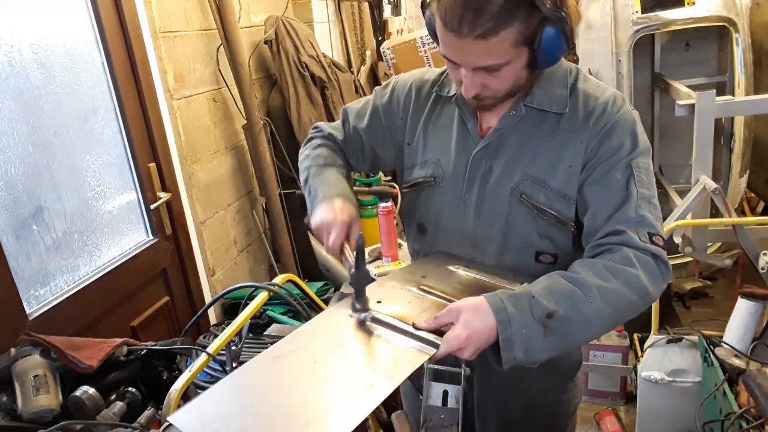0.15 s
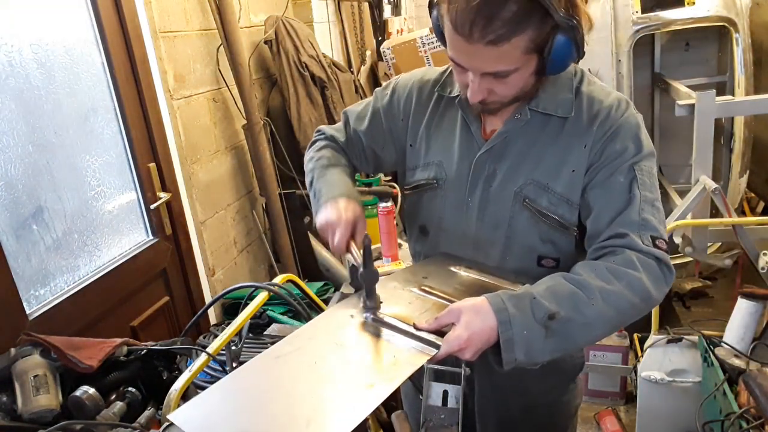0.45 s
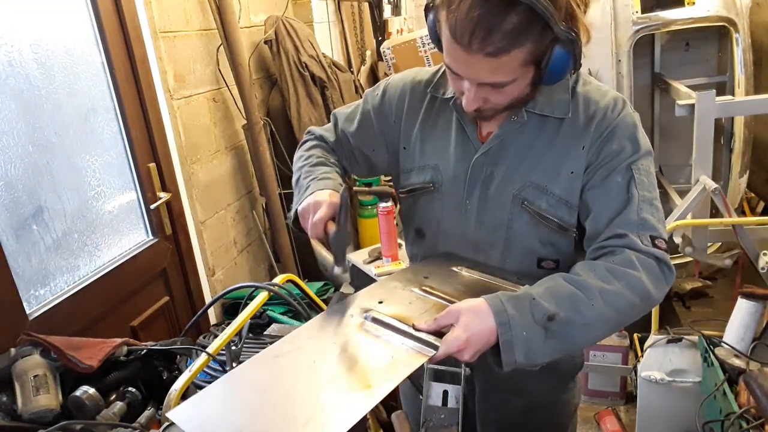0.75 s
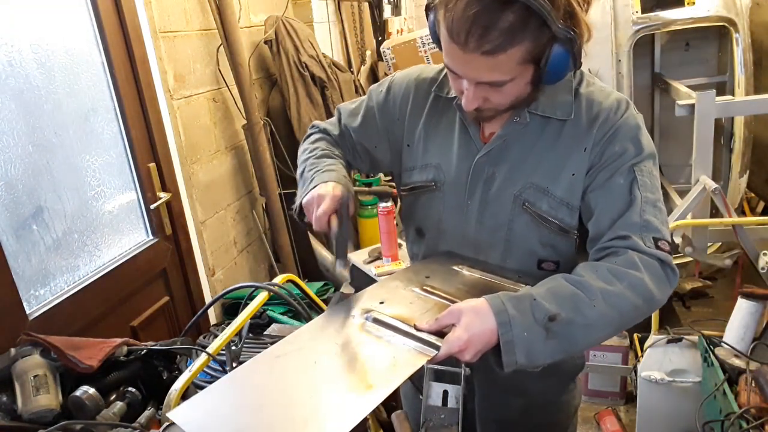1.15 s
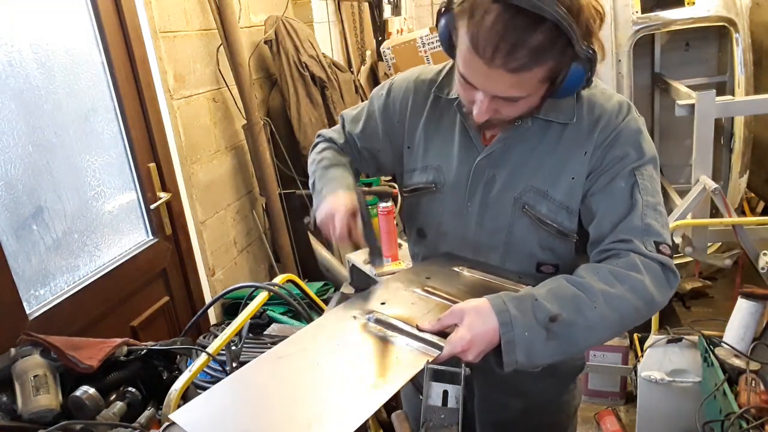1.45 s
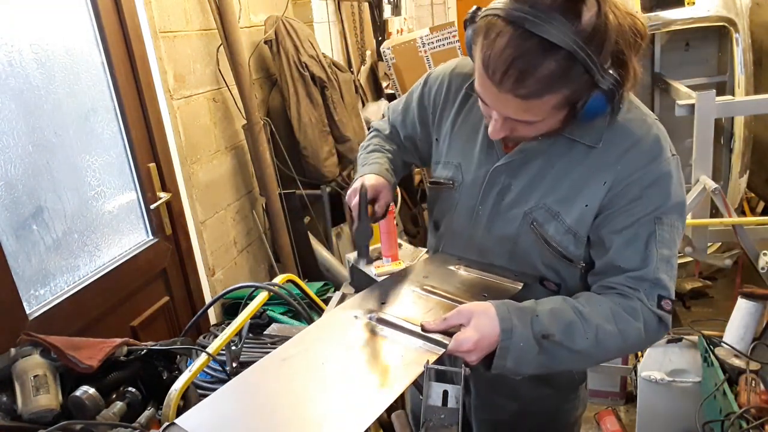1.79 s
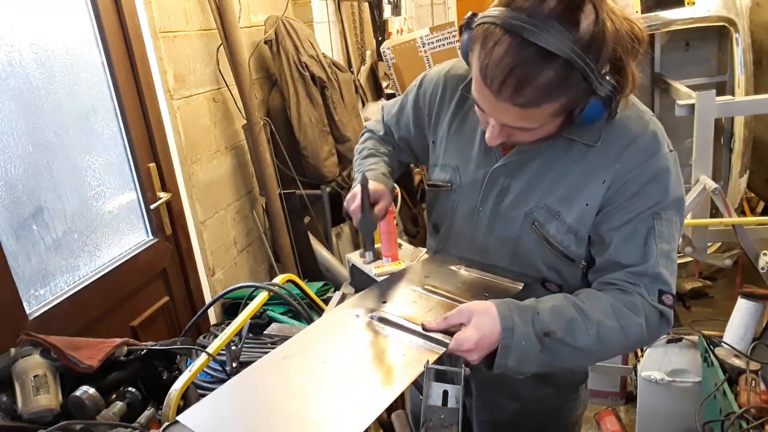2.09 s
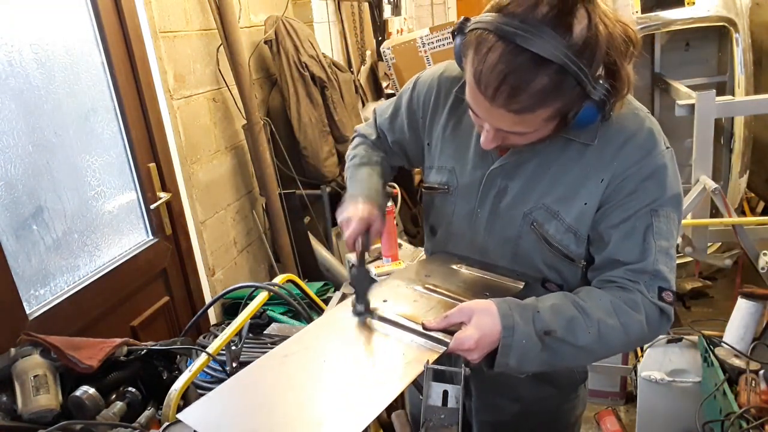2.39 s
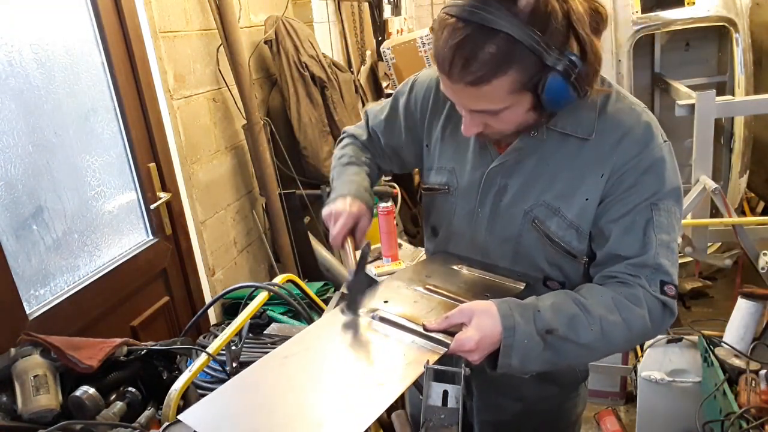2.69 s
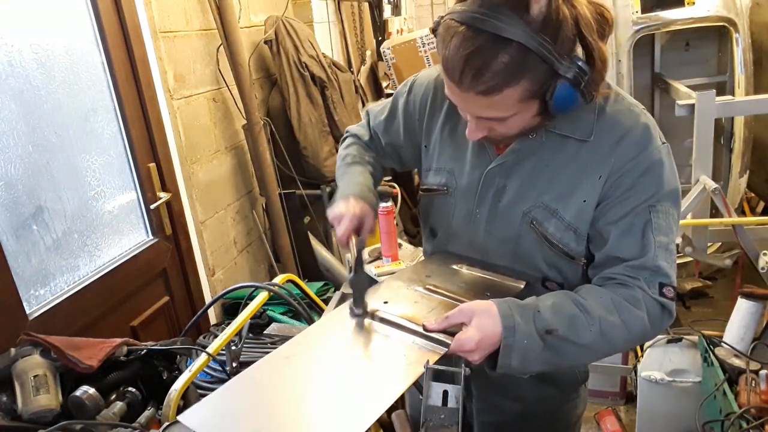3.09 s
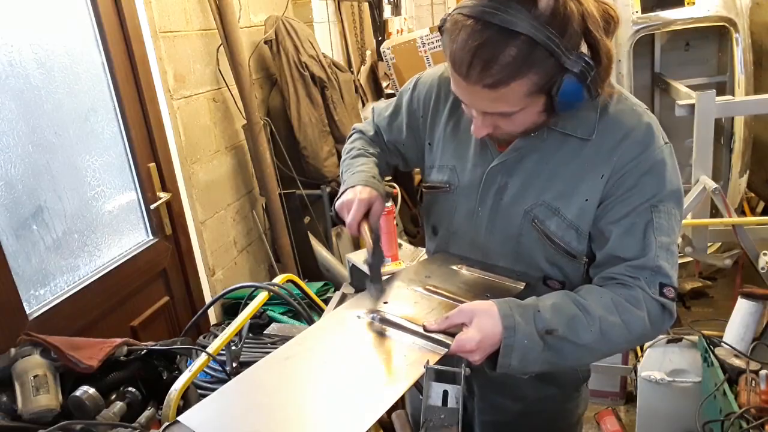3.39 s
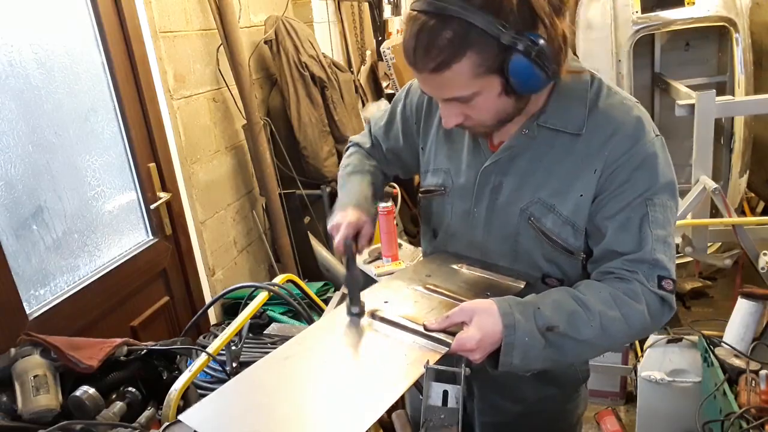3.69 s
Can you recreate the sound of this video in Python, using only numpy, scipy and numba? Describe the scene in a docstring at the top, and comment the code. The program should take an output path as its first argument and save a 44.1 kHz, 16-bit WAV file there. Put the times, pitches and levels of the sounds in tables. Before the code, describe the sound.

A hammer taps very rapidly on sheet steel, bright and ringing, with one brief pause.

```python
"""Hand hammer planishing a steel panel over a form tool: about 14 blows/s, in runs with short pauses.
Per blow: contact crack, dull knock of the dented patch, bright clash of the sheet's dense modes,
and a ring of longer modes whose balance depends on how the sheet lies on the tool.
The loose sheet also chatters lightly on the tool.
A small cluttered workshop adds a short tail and faint room noise."""
import sys
import numpy as np
from scipy import signal
from scipy.fft import rfft, irfft
from scipy.io import wavfile
from numba import njit

SR = 44100
rng = np.random.default_rng(int(sys.argv[2]) if len(sys.argv) > 2 else 0)


def store_pcm(level_fs):
    """Save levels as 16-bit WAV."""
    pcm = np.round(np.clip(level_fs, -1, 1) * 32767).astype(np.int16)
    wavfile.write(sys.argv[1], SR, np.atleast_2d(pcm).T)


N = 169785

# workshop reverberation: f/Hz, level/dB, t60/s
ROOM = [(396, -27, 0.2), (1040, -18.5, 0.36), (3000, -20, 0.043), (8000, -41.5, 0.086), (16000, -31.5, .21)]
# light touches of sheet on tool: t/s, level/dB, centre f/Hz, width/octaves, t60/s
TOUCHES = [(1.573, -34.5, 11700, 0.0064, 0.23), (1.574, -45.5, 8870, 0.006, 0.23),
           (1.634, -60, 1900, 1.4, 0.2), (1.81, -68.5, 1570, 2.3, 0.096), (3.185, -19, 3000, 0.99, 0.032)]
# hammer blows: t/s, relative level/dB, bass/dB, mid/dB, upper mid/dB, knock f/Hz
BLOWS = [(-0.064, 6, 27, 11, 5.5, 500), (0.1185, 1, 3.5, 0, -2, 470), (0.2002, -1, 3.5, 4, 3, 543),
         (0.2796, -2.5, 2, 3, 3, 590), (0.351, -2, -2, 2.5, 0.5, 814), (0.4244, -2, 1.5, 4, 2, 705.0),
         (0.495, -0.5, 1, 0.5, -0.5, 546), (0.5654, 0.5, 5.5, 1.5, -0.5, 685),
         (0.633, -1, 3.5, -0.5, 1.5, 630), (0.699, 0, 4, 0.5, -1, 570), (0.7676, -2, 5, 3.5, 1.5, 564),
         (0.8362, -2, 5, 5.5, 3, 410), (0.903, 0, -3.5, -2, -1.5, 343), (0.9683, -1.5, -1.5, 5, 1.0, 590),
         (1.0358, 1, 2, 2.5, 0.5, 390), (1.1038, -1, 3.5, 3.5, 1.5, 600), (1.1704, -2, 6, 3.5, 2.5, 610),
         (1.2396, -2.5, 4.5, 6, 4, 357), (1.3099, -2, 0.5, 5, 2.5, 553), (1.38, -1.5, 3, 4.5, 2, 580),
         (1.4501, -1.5, 2.5, 2.5, 3, 705), (1.5215, -2.5, 8.5, 3, 4, 487), (1.8773, 1, -1.5, 0, -1, 610),
         (1.9511, -1, 7, 1, 4, 760), (2.024, -0.5, 1, 4, 2.5, 765), (2.096, 0, 1, 3, 2, 342),
         (2.1672, -1, 5, 2.5, 2, 543), (2.237, -1.5, -0.5, 1.5, 3.5, 440), (2.3061, -0.5, 0, 1, 1.5, 670),
         (2.3753, -1, 0, 1, 0.5, 500), (2.4444, -1.5, 3, 4, 1, 770), (2.5143, -2, -0.5, 5, 1.5, 696),
         (2.5836, -2.5, 3, 5, 4, 543), (2.6535, -1.5, 3, 4, 2.5, 730), (2.7234, -1, 0.5, 5, 1, 700),
         (2.794, 0, -1, 2, -1.5, 520), (2.8631, 0, -2.5, 1, 0.5, 690), (2.931, 0, -3, 3.5, -1, 804),
         (2.999, -1, -2.5, 4.5, 1, 400), (3.0665, -1.5, 1, 5, 1, 590), (3.1359, -1, 2, 1, 3, 600),
         (3.2034, -1, 2, 2.5, 0, 670), (3.2723, -2.5, 7, 5.5, 3, 573), (3.341, -0.5, 4.5, 1.5, 2, 660),
         (3.4091, -0.0, -5.5, 2.5, -3, 725), (3.4779, -2.5, 5, 5.5, 2.5, 467),
         (3.5979, 0.5, 0.5, 2, 0, 437), (3.6765, -1, 2, 1.5, 1.5, 340.7), (3.7473, -1, 2, 0.5, 0, 494)]
# anchors of a blow's colour (bass, mid, upper mid, 0 dB top): f/Hz
COLOUR_HZ = [400, 1500, 5000, 12500]
# contact crack: f/Hz, relative density/dB
CRACK = [(60, -39.5), (300, -15), (1000, 6), (3500, 0), (8000, 7), (11000, 3), (16000, 9)]
# clash of dense modes: f/Hz, relative density/dB, hold/s, t60/s
CLASH = [(99, -39, 0.01, .08), (202, -7, 0.0038, 0.079), (343, 4.5, 0.0018, 0.06), (700, 2.5, 0.0047, 0.06),
         (1130, 0.5, 0.006, 0.12), (1610, 3, 0.012, 0.1), (2920, 0.5, 0.011, 0.12),
         (3840, 3.5, 0.0052, 0.11), (5670, 2, 0.011, 0.11), (8700, 4, 0.019, 0.095),
         (10400, 3.5, 0.018, 0.11), (12100, 6.5, 0.026, 0.072), (16100, 6.5, 0.0085, 0.12)]
# sheet moves to its next lie on the tool: t/s
LIE_SHIFTS_S = [0, 1.7, 2.83, 3.7]
# strong steel modes: f/Hz
STRONG_HZ = [1692, 1766, 1822, 1992, 2612, 5065, 5892, 6304, 8786, 10390, 11665, 13060]
# one row per strong mode: relative level/dB in each of five lies, t60/s
STRONG_MODES = [(-60.5, -42, -40, -37, -34.5, 0.23), (-43, -54, -56, -58, -60, 0.35),
                (-60.5, -58.5, -60, -47.5, -42, 0.24), (-46, -34.5, -37.5, -49, -56, 0.11),
                (-56, -41, -40, -35.5, -45, 0.17), (-54.5, -44.5, -51, -46, -58, .19),
                (-62, -48, -37.5, -36.5, -48, 0.14), (-23.5, -39, -50, -49, -58, 0.18),
                (-29, -34.5, -37, -38.5, -35, 0.19), (-57, -52, -34.5, -52, -55, 0.2),
                (-34.5, -40.5, -40, -40, -43, .23), (-54, -43, -35, -35, -41, .16)]
# shimmer of weak modes: f/Hz, relative level per mode/dB, t60/s
SHIMMER = [(1000, -44.5, 0.17), (3200, -47.5, 0.17), (7000, -40, 0.095), (16000, -38.5, 0.22)]
# lesser modes standing out of the shimmer: f/Hz
LESSER_HZ = [905, 1000, 1335, 1630, 2250, 2345, 3030, 3140, 3650, 3868, 4282, 4735, 4823, 6097, 7480, 7830,
             8200, 9120, 9550, 11250, 12550, 14827, 14978, 15515]
# gaps between mode groups: f/Hz
GAP_HZ = [1190, 4130, 4480, 5550, 7260]

BLOW_GAIN_DB, ATTACK_S = -6, 0.00029
AGE_S = np.arange(15000) / SR  # time within one blow
BIN_HZ = np.maximum(np.fft.rfftfreq(len(AGE_S), 1 / SR), 1)
BAND_HZ = np.geomspace(40, 16000, 27)  # third octaves


def undb(db):
    """dB to gain."""
    return 10 ** (np.asarray(db) / 20)


def at(hz, table, column=1):
    """Table column, interpolated over log frequency."""
    table = np.array(table, float)
    return np.interp(np.log(hz), np.log(table[:, 0]), table[:, column])


def rise(tau_s):
    """Exponential onset."""
    return 1 - np.exp(-AGE_S / tau_s)


def fade(t60_s, hold_s=0):
    """Hold, then exponential decay."""
    return np.exp(-np.log(1000) * np.maximum(AGE_S - hold_s, 0) / t60_s)


def noise():
    """White noise, one blow long."""
    return rng.standard_normal(len(AGE_S))


def tint(x, db):
    """Filter by a dB curve over BIN_HZ."""
    return irfft(rfft(x) * undb(db), len(x))


def unit_power(db):
    """Shift a dB curve to unit mean power."""
    return db - 10 * np.log10(np.mean(undb(db) ** 2))


def by_band(x, envelopes):
    """Apply one envelope per band."""
    spectrum = rfft(x)
    return sum(envelope * irfft(spectrum * np.interp(BIN_HZ, BAND_HZ, pick), len(x))
               for envelope, pick in zip(envelopes, np.eye(len(BAND_HZ))))


def add(out, x, start_s):
    """Mix x into out at start_s."""
    i = int(round(start_s * SR))
    x, i = x[max(-i, 0):], max(i, 0)
    out[i:i + len(x)] += x[:len(out) - i]


def blend(a, b, share):
    """Constant-power mix; share is that of a."""
    return np.sqrt(share) * a + np.sqrt(1 - share) * b


@njit
def ring_down(phasors, poles, count):
    """Sum of phasors, each advanced by its pole per sample."""
    out, z = np.zeros(count), phasors.copy()
    for i in range(count):
        for k in range(len(z)):
            out[i] += z[k].imag
            z[k] *= poles[k]
    return out


def mode_sum(hz, db, t60_s):
    """Damped sines, random phases."""
    phasors = undb(db) * np.exp(2j * np.pi * rng.random(len(hz)))
    poles = np.exp((2j * np.pi * hz - np.log(1000) / t60_s) / SR)
    return ring_down(phasors, poles, len(AGE_S))


def room_noise(level_db=-90, corner_hz=600):
    """Very faint, dull background."""
    x = signal.sosfilt(signal.butter(1, corner_hz, fs=SR, output="sos"), rng.standard_normal(N))
    return undb(level_db) * x / x.std()


def workshop(x, build_s=0.0032):
    """Short diffuse reverberation of a cluttered room."""
    envelopes = [fade(at(hz, ROOM, column=2)) * rise(build_s) for hz in BAND_HZ]
    response = by_band(tint(noise(), at(BIN_HZ, ROOM)), [e / np.linalg.norm(e) for e in envelopes])
    return signal.fftconvolve(x, response)[:N]


def touches(tone_share=0.47):
    """Loose sheet chatters on the tool: its modes plus a rattle of the same colour."""
    out, hz = np.zeros(N), np.r_[STRONG_HZ, LESSER_HZ]
    for start_s, db, centre_hz, octaves, t60_s in TOUCHES:
        shape_db = lambda f: -20 * np.log10(1 + (np.log2(f / centre_hz) / octaves) ** 2)
        tones = mode_sum(hz, shape_db(hz), np.inf)
        rattle = tint(noise(), shape_db(BIN_HZ))
        chatter = blend(tones / tones.std(), rattle / rattle.std(), tone_share)
        add(out, undb(db) * chatter * rise(ATTACK_S) * fade(t60_s), start_s)
    return out


def weak_modes_hz(count=120, low_hz=1900, high_hz=15800):
    """Thin plate: modes spread evenly over frequency."""
    return low_hz + (high_hz - low_hz) * (np.arange(count) + rng.random(count)) / count


def gaps_db(hz, depth_db=-3, width_hz=155):
    """The sheet responds weakly between mode groups."""
    return depth_db * sum(np.exp(-((hz - gap_hz) / width_hz) ** 2) for gap_hz in GAP_HZ)


def spot_colour_db(spread_db=2.4, step_hz=170):
    """Each struck spot favours some mode groups."""
    knots_hz = np.arange(0, SR / 2, step_hz)
    return spread_db * np.interp(BIN_HZ, knots_hz, rng.standard_normal(len(knots_hz)))


def ring(lie, weak_hz, strong_gain_db=11, lesser_gain_db=8, detune_hz=4, scatter_db=3, rise_s=0.0024):
    """Strong, lesser and weak long modes; pressure on the tool detunes them per blow."""
    strong = np.array(STRONG_MODES, float)
    hz = np.r_[STRONG_HZ, LESSER_HZ, weak_hz]
    db = np.r_[strong[:, lie] + strong_gain_db,
               at(LESSER_HZ, SHIMMER) + lesser_gain_db,
               at(weak_hz, SHIMMER) + gaps_db(weak_hz)]
    stretch = 1.6 if lie == len(LIE_SHIFTS_S) else 1  # last lie: held loosely, rings longer
    t60_s = np.r_[strong[:, -1] * stretch, at(hz[len(strong):], SHIMMER, column=2)]
    detune, scatter = rng.standard_normal((2, len(hz)))
    return rise(rise_s) * mode_sum(hz + detune_hz * detune, db + scatter_db * scatter, t60_s)


def knock(hz, gain_db=-18.5, rise_s=0.0018, t60_s=0.027):
    """Struck patch flexes for a few cycles, damped by tool and hand."""
    return undb(gain_db) * rise(rise_s) * fade(t60_s) * np.sin(2 * np.pi * hz * AGE_S)


def clash(mode_noise, colour_db, gain_db=-10):
    """Dense sheet modes as noise; each band holds, then decays."""
    spectrum_db = unit_power(at(BIN_HZ, CLASH) + gaps_db(BIN_HZ)) + gain_db
    envelopes = [fade(at(hz, CLASH, column=3), at(hz, CLASH, column=2)) for hz in BAND_HZ]
    return by_band(tint(mode_noise, spectrum_db + colour_db + spot_colour_db()), envelopes)


def crack(colour_db, gain_db=-2.5, t60_s=0.018):
    """Hammer contact: short bright noise burst."""
    spectrum_db = unit_power(at(BIN_HZ, CRACK)) + gain_db
    return tint(noise(), spectrum_db + colour_db) * fade(t60_s)


def hammering(common_share=0.28, spot_memory=0.19):
    """All blows; the mix of dense modes changes as the struck spot wanders."""
    out = np.zeros(N)
    sheet, spot, weak_hz = noise(), noise(), weak_modes_hz()
    for start_s, db, bass_db, mid_db, upper_db, knock_hz in BLOWS:
        colour_db = np.interp(np.log(BIN_HZ), np.log(COLOUR_HZ), [bass_db, mid_db, upper_db, 0])
        spot = blend(spot, noise(), spot_memory)
        mode_noise = blend(sheet, spot, common_share)
        impact = rise(ATTACK_S) * (clash(mode_noise, colour_db) + crack(colour_db))
        lie = np.searchsorted(LIE_SHIFTS_S, start_s)
        blow = impact + undb(bass_db) * knock(knock_hz) + ring(lie, weak_hz)
        add(out, undb(BLOW_GAIN_DB + db) * blow, start_s)
    return out


def scene():
    """Panel work in the workshop, mono."""
    steel = hammering() + touches()
    return (steel + workshop(steel) + room_noise())[None]


def record(dry, peak_limit=0.82, low_cut_hz=110, high_cut_hz=15850):
    """Soft peak limit, low cut, steep high cut."""
    rounded = peak_limit * np.tanh(dry / peak_limit)
    thinned = signal.sosfilt(signal.butter(2, low_cut_hz, "high", fs=SR, output="sos"), rounded)
    return signal.sosfilt(signal.ellip(10, .2, 75, high_cut_hz, fs=SR, output="sos"), thinned)


dry = scene()
out = record(dry)
store_pcm(out)
```